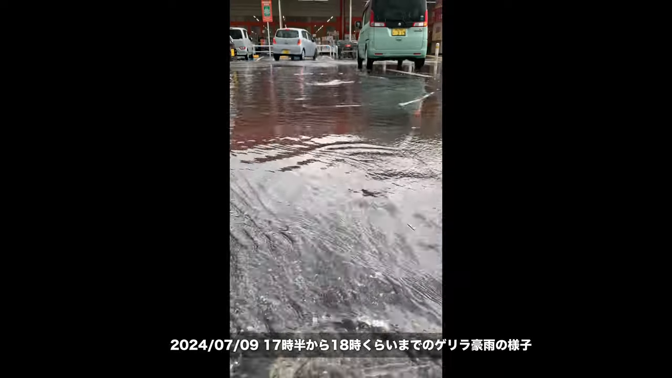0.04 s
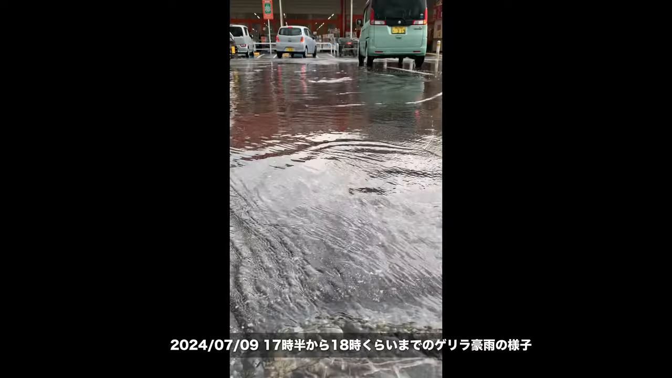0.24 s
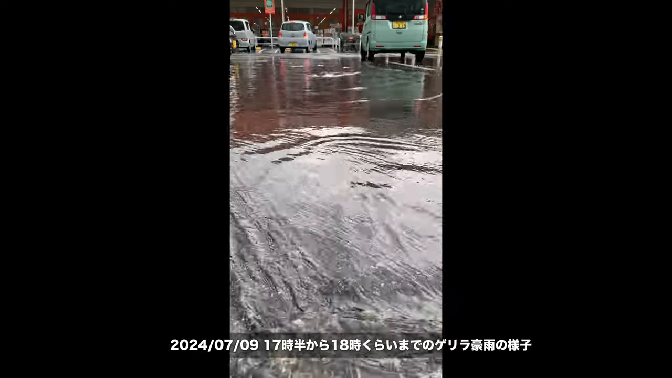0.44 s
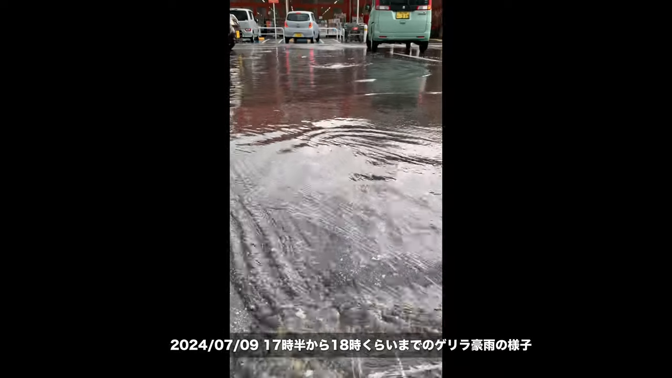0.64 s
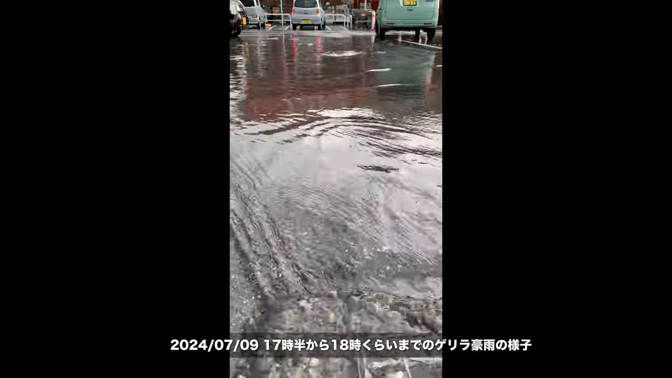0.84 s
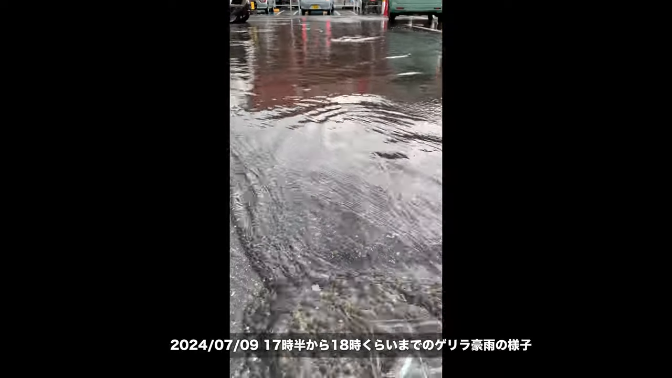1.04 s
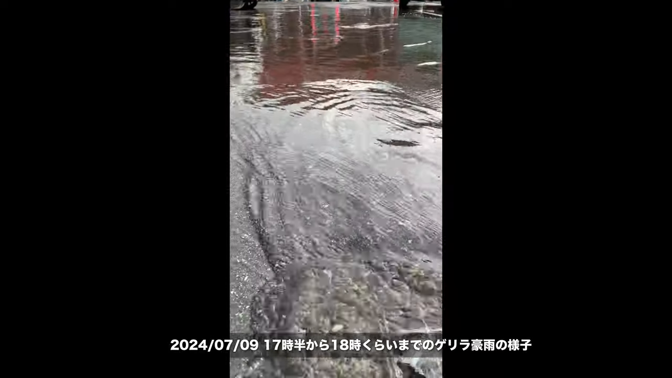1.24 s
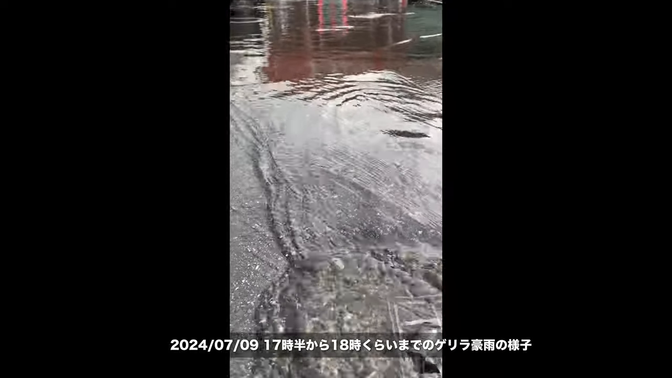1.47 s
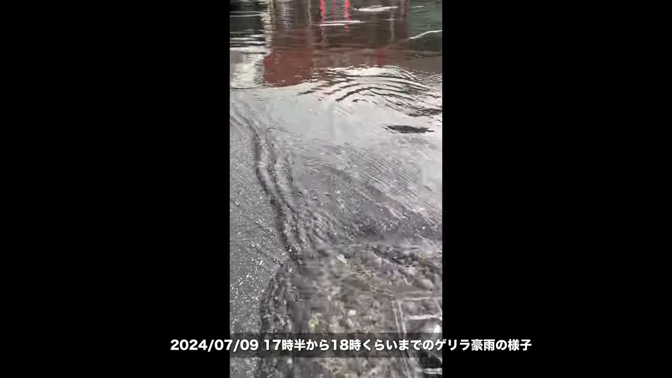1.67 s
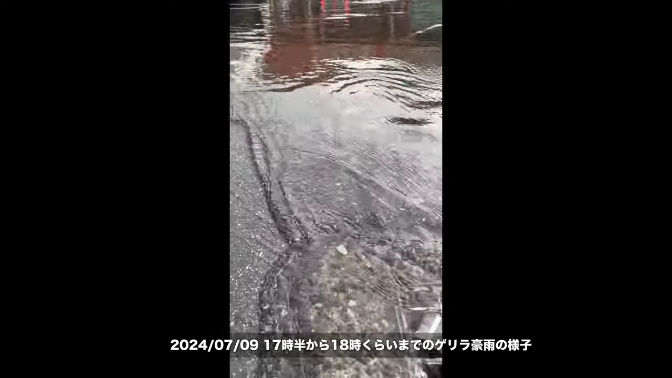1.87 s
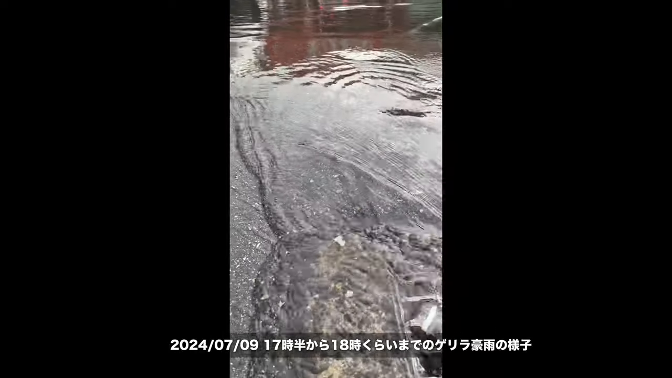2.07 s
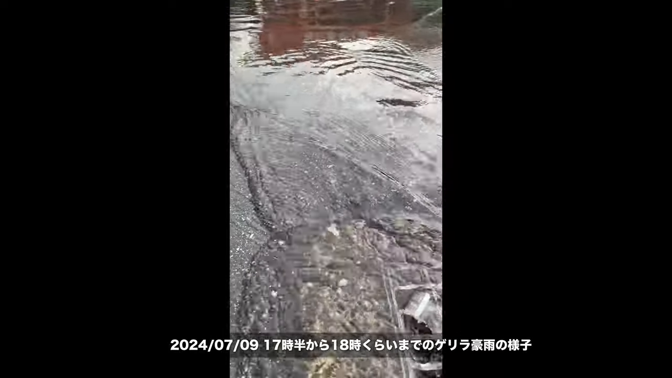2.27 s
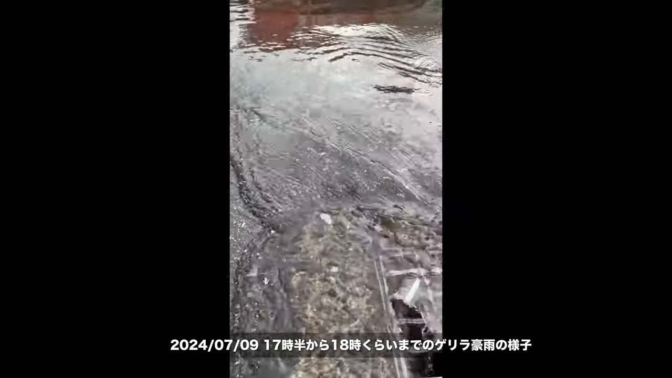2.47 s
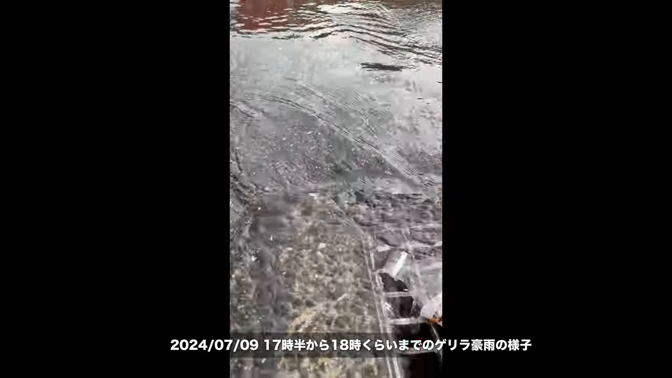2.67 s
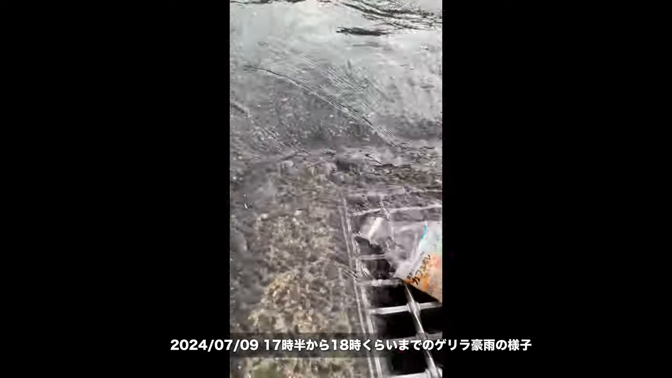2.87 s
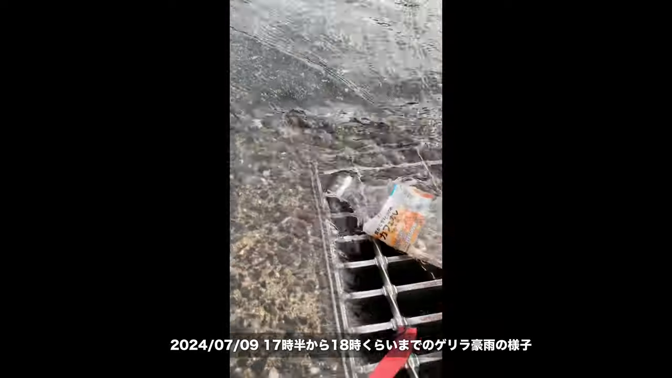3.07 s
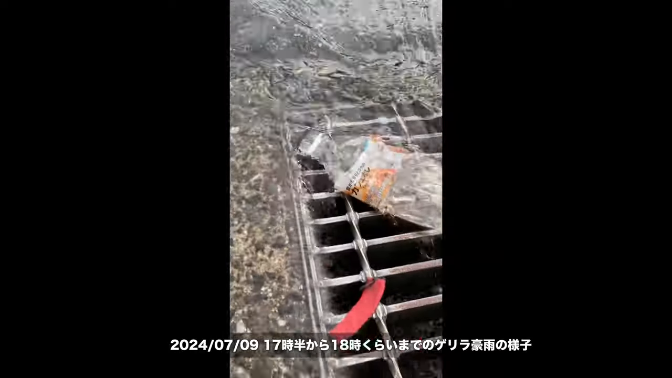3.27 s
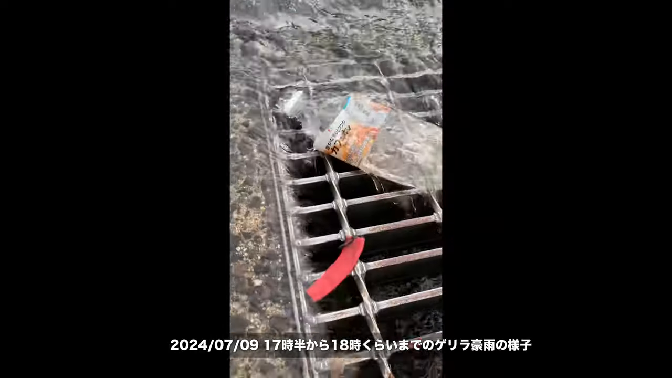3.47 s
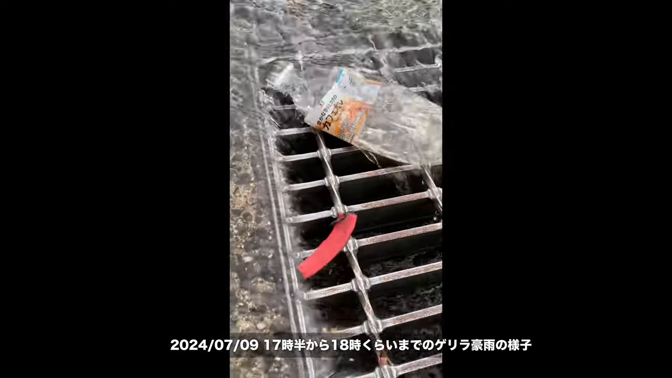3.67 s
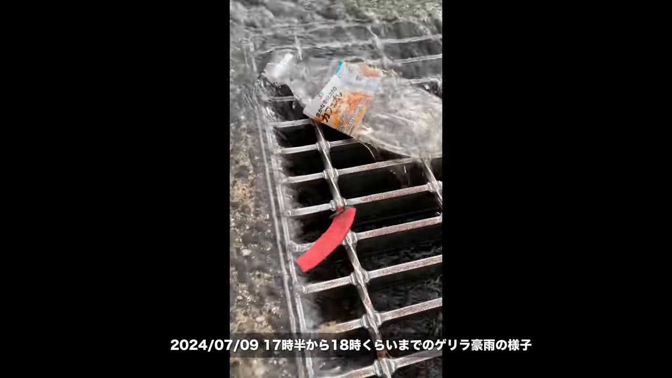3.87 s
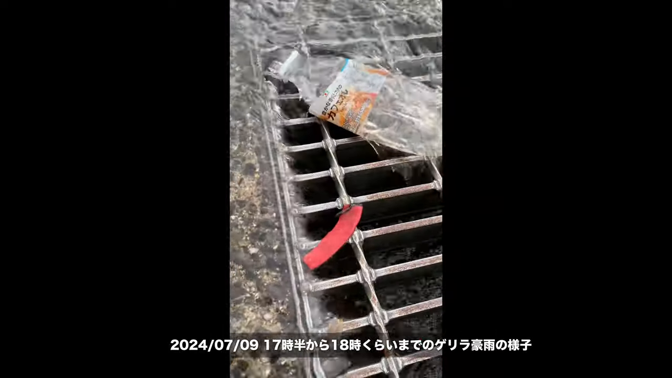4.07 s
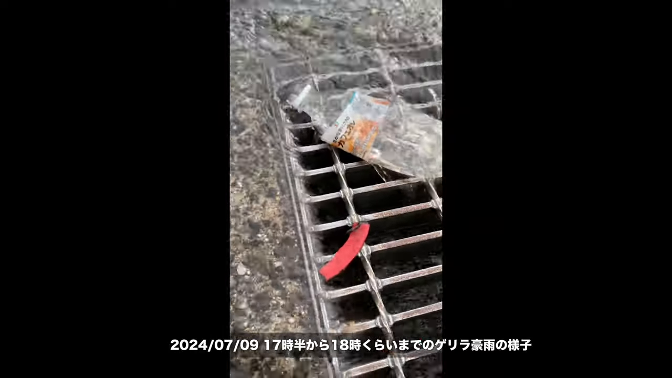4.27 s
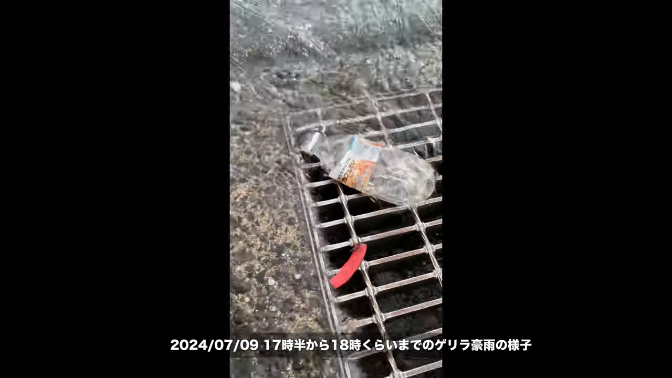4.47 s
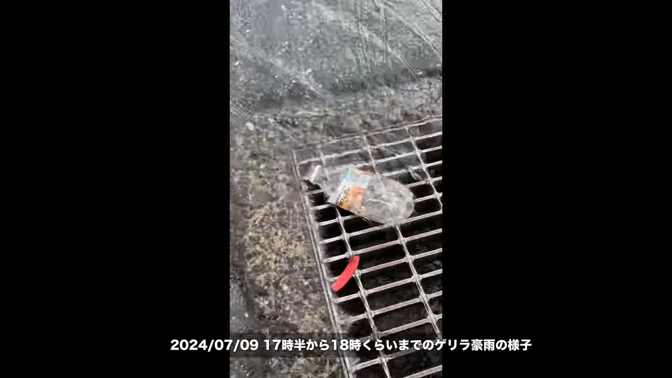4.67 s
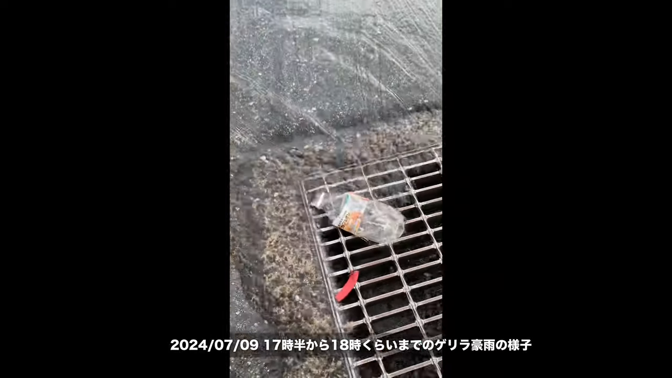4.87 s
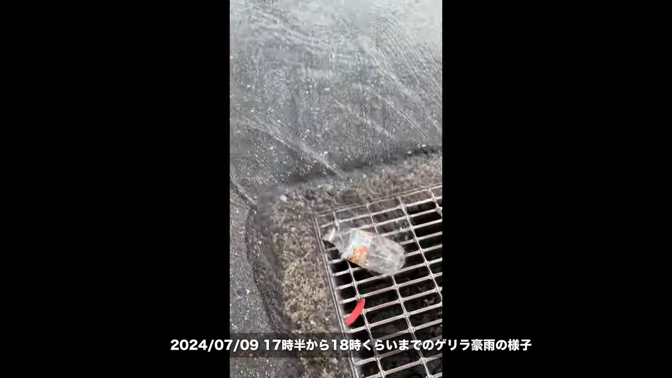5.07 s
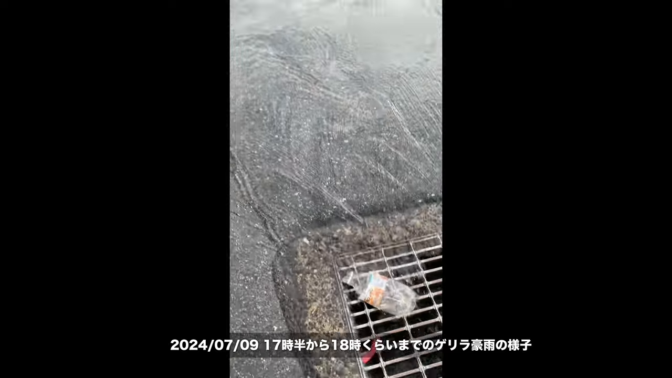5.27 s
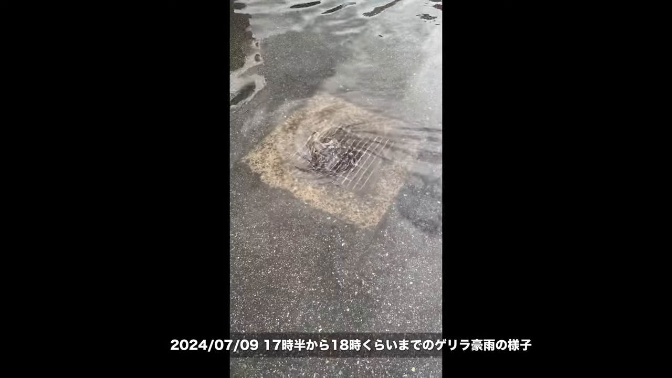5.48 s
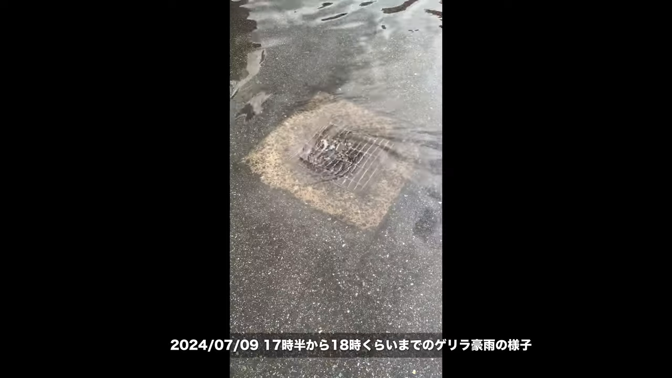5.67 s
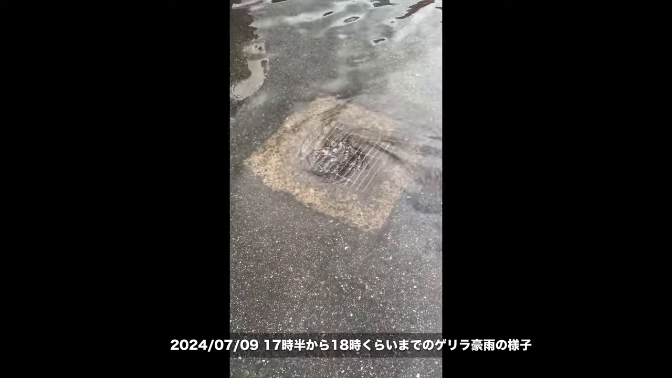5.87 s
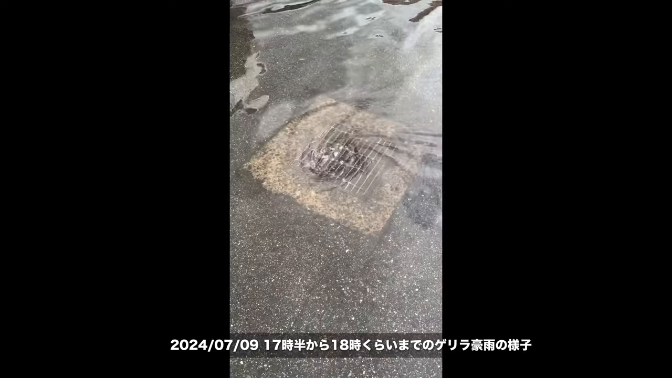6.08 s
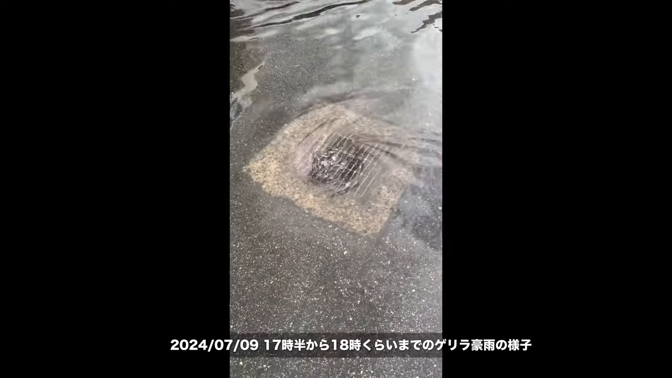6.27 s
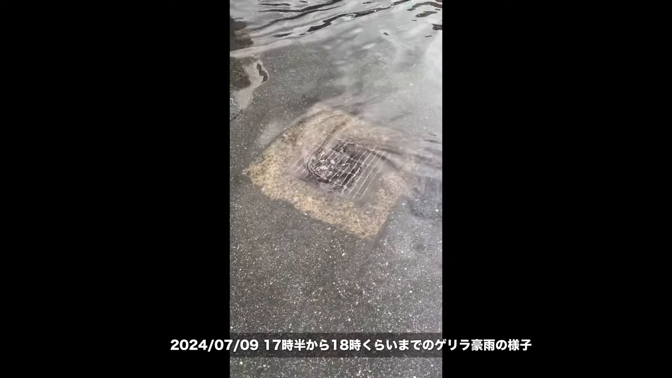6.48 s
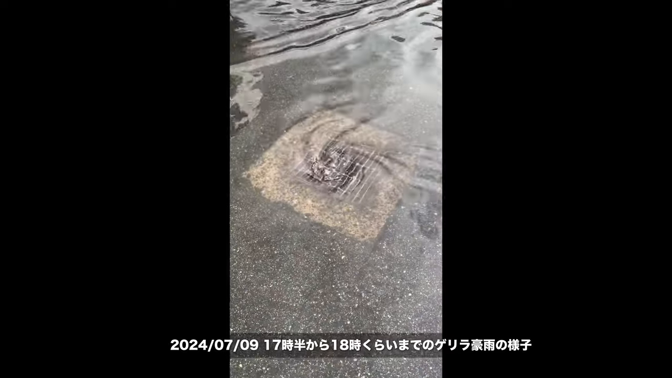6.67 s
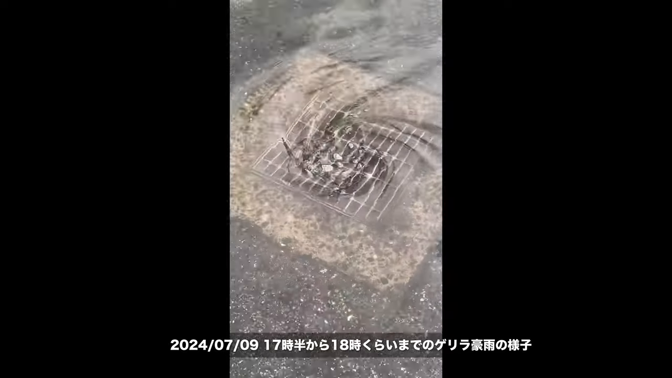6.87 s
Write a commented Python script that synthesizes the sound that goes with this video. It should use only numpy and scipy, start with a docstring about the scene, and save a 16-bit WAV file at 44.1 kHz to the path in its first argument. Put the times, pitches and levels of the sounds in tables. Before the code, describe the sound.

Floodwater rushes over pavement and gurgles into a metal drain grate, spitting and swelling close, then cuts to a quieter, smoother whirlpool drain.

```python
"""Spray spits and gurgle swells as floodwater slides over pavement and falls through a grate into a drain.
Bubbles burst and wind puffs thump a hand-held two-port microphone as it moves in and away; traffic drones far off.
A hard cut leads to a quieter whirlpool over a second drain. Coloured noise carries the flow, the rumble and
the traffic; swelling, dying sines make the bubbles and puffs; short noise bursts add the crack to each spit."""
import sys
import numpy as np
from scipy import signal
from scipy.fft import rfft, irfft, next_fast_len
from scipy.io import wavfile
from scipy.ndimage import uniform_filter1d

SR = 44100
rng = np.random.default_rng(int(sys.argv[2]) if len(sys.argv) > 2 else 0)


def digitize_waveform(pressure):
    """Quantize a signal to 16-bit integers and store it at the path in sys.argv[1].

    Rows of a 2-D input are taken as channels; values are limited to [-1, 1].
    """
    field = np.atleast_2d(pressure).T
    bounded = np.clip(field, -1, 1)
    quanta = np.round(bounded * 32767).astype(np.int16)
    wavfile.write(sys.argv[1], SR, quanta)


N = 306054
CUT_S = 5.315  # the moment the place changes
CUT = round(CUT_S * SR)
CUT_MARGIN = 300  # samples by which each place's flow overlaps the cut

# The microphone's path over the grate: start_s [s], nearness_db [dB], rumble_db [dB]
GRATE_PATH = [(0, 2.5, -39.5), (.8, 4.5, -42), (1.2, 1.5, -38), (1.6, 3.5, -43), (2, 2.5, -42.5),
              (2.8, 7.5, -47), (3.13, 7, -39), (3.35, 13, -70), (3.7, 12.5, -49), (4.05, 13.5, -48),
              (4.35, 12, -45), (4.7, 7.5, -47.5), (5.3, 4.5, -51)]
# Noise colours at the grate: pitch_hz [Hz], level_db [dB per Hz, relative]
GRATE_RUMBLE = [(12, -46), (20, -14), (34, -6), (54, 17.5), (70, 12.5), (125, -8), (168, -3.5), (289, -15),
                (323, -22), (357, -17.5), (400, -19), (520, -14.5), (880, -120)]
GRATE_GURGLE = [(150, -1), (300, -5), (450, -1.5), (650, -6), (800, -2.5), (1200, -3), (1800, -4),
                (2500, -8.5), (3500, -25.5), (6000, -86)]
GRATE_SPRAY = [(1500, -20), (2500, -2.5), (3200, 1.2), (4200, .5), (5000, 1.3), (6200, .5), (8000, -1),
               (12000, -1.5), (13500, -8.5), (16000, -8)]
# Likeness of the two ports at the grate: pitch_hz [Hz], likeness [0-1]
GRATE_SAME = [(60, .975), (300, .94), (700, .8), (1200, .85), (2000, .65), (2800, .15), (3600, .69),
              (4200, .78), (4700, .98), (5300, .8), (6100, .76), (6800, .98), (7300, .94), (7800, .68),
              (8300, .74), (8900, .98), (9400, .88), (10000, .7), (11000, .96), (11500, .94), (12100, .66),
              (13000, .97), (13500, .96), (14100, .5), (15000, .97)]
# Phase between the ports at the grate: pitch_hz [Hz], left_lead_rad [rad]; a plain delay above 4.7 kHz
GRATE_LEAD = [(60, .1), (300, -.3), (950, -.55), (1600, .15), (2300, 1.4), (3100, .7), (4700, 3.14),
              (15300, 18.85)]


def grate():
    """Water falls through the grate, and spray and gurgle swell as the microphone closes in."""
    flow = water(0, CUT + CUT_MARGIN, GRATE_PATH,
                 traffic(CUT + CUT_MARGIN, GRATE_RUMBLE),
                 gurgle(CUT + CUT_MARGIN, GRATE_GURGLE, bubbles_db=-3.),
                 spray(CUT + CUT_MARGIN, GRATE_SPRAY, fizz_db=-5., lumpy_db=1.9),
                 drone_db=-38.5, gurgle_db=-38, spray_db=-41.5)
    return ports(flow + splashes(0), GRATE_SAME, GRATE_LEAD)


# The whirlpool's levels over time: start_s [s], nearness_db [dB], rumble_db [dB]
POOL_PATH = [(5.42, 0.14, -47), (5.55, -0.69, -45), (5.8, -0.93, -35), (5.95, -0.93, -46.5),
             (6.4, -1.7, -39), (6.9, -1.5, -38.5)]
# Noise colours at the whirlpool: pitch_hz [Hz], level_db [dB per Hz, relative]
POOL_RUMBLE = [(12, -42), (20, -33), (39, 0.5), (65, -13), (99, -3.5), (123, -17), (140, -5), (189, -3),
               (289, -17), (353, -16.5), (400, -47), (520, -76), (880, -120)]
POOL_GURGLE = [(150, -44), (300, -12), (550, -7.5), (700, -15), (1300, -8), (2200, -12.5), (3200, -18.5),
               (6000, -30.5)]
POOL_SPRAY = [(1500, -25), (3500, -2.5), (5000, 0), (6500, -1), (7500, -4.5), (8300, -3), (8900, 0),
              (10300, 0), (11000, -2), (12000, -3), (13500, -10), (14500, -13), (16000, -16)]
# Likeness of the two ports at the whirlpool: pitch_hz [Hz], likeness [0-1]
POOL_SAME = [(60, .975), (300, .9), (700, .6), (1500, .8), (3200, .55)] + GRATE_SAME[6:]
# Phase between the ports at the whirlpool: pitch_hz [Hz], left_lead_rad [rad]; a plain delay above 4.7 kHz
POOL_LEAD = [(60, .1), (250, -.3), (520, -.9), (900, -3.3), (1700, -4.3), (2800, -3.8), (3500, -4.9),
             (4700, -3.14), (15300, 12.57)]


def whirlpool():
    """A quieter swirl over the second drain, with fewer strong bubbles and a smoother spray."""
    start = CUT - CUT_MARGIN
    flow = water(start, N, POOL_PATH,
                 traffic(N - start, POOL_RUMBLE),
                 gurgle(N - start, POOL_GURGLE, bubbles_db=-11.),
                 spray(N - start, POOL_SPRAY, fizz_db=-10., lumpy_db=1.1),
                 drone_db=-45, gurgle_db=-41, spray_db=-45)
    return ports(flow + splashes(CUT_S + .1), POOL_SAME, POOL_LEAD)


GURGLE_FOLLOWS = 0.62  # dB of gurgle for each dB that the spray gains
DRONE_FOLLOWS = -0.28  # dB of traffic per dB of nearness: screened a little low over the grate


def water(start, stop, path, traffic_noise, body, hiss, drone_db, gurgle_db, spray_db):
    """Rides the faders of one place between two samples; the drone, gurgle and spray levels hold at nearness 0."""
    s, *controls = np.transpose(path)
    near_db, rumble_db = (np.interp(np.arange(start, stop) / SR, s, db) for db in controls)
    bottom = signal.sosfiltfilt(signal.butter(3, 110, fs=SR, output="sos"), traffic_noise)
    out = amp(rumble_db) * evened(bottom)
    out += amp(drone_db + DRONE_FOLLOWS * near_db) * evened(traffic_noise - bottom)
    out += amp(gurgle_db + GURGLE_FOLLOWS * near_db) * evened(body)
    out += amp(spray_db + near_db) * evened(hiss)
    return np.pad(out, ((0, 0), (start, N - stop)))


def spray(n, colour, fizz_db, lumpy_db):
    """A hiss of fine drops carries ringing fizz and shorter ticks of spatter on the bars."""
    ticks_db = fizz_db - 5.
    hiss = wash(n, colour, size=256, patchy_db=lumpy_db, flicker_db=0.98 * lumpy_db)
    fizz = grains(n, colour, 2454.0, 14750.0, cycles=6., per_s=1200., spread_db=4.5, is_spray=True)
    ticks = grains(n, colour, 2730.0, 12800.0, cycles=1.6, per_s=300., spread_db=3., is_spray=True)
    return hiss + amp(fizz_db) * fizz + amp(ticks_db) * ticks


def gurgle(n, colour, bubbles_db):
    """Tumbling water is a patchy noise that carries ringing bubbles of many sizes."""
    body = wash(n, colour, size=512, patchy_db=2.5, flicker_db=0.52)
    bubbles = grains(n, colour, 297.7, 3916.0, cycles=9.12, per_s=800., spread_db=3.5, is_spray=False)
    return body + amp(bubbles_db) * bubbles


CLUMP_S, CLUMP_DB = .06, 3.  # smoothing time and depth of the surges that bubbles come in


def grains(n, colour, low_hz, high_hz, cycles, per_s, spread_db, is_spray):
    """Sparse random bubbles of many sizes, a few of them loud; returns the near sound and its scattered copy."""
    count = 30
    surge = evened(uniform_filter1d(rng.standard_normal(n), round(CLUMP_S * SR)))
    strength = amp(spread_db * np.minimum(rng.exponential(1, n), 4))
    strikes = strength * (rng.random(n) < per_s * amp(CLUMP_DB * surge) / SR)
    kind, out = rng.integers(0, count, n), np.zeros(n)
    for k, hz in enumerate(np.geomspace(low_hz, high_hz, count)):
        shape = bubble(hz, cycles * rng.uniform(0.57, 1.6))
        # log spacing puts fewer sizes into each treble hertz, hence the root of the pitch
        gain = amp(read(colour, hz)) * np.sqrt(hz) / np.linalg.norm(shape)
        out += signal.oaconvolve(strikes * (kind == k), gain * shape)[:n]
    return scattered(evened(out), is_spray)


def splashes(start_s):
    """The single spits, plops, glugs and puffs that stand out of the flow after a moment."""
    late = np.arange(N) / SR >= start_s
    low_sounds = plops() + glugs() + puffs()
    return scattered(spits() * late, True) + scattered(low_sounds * late, False)


CRACK_HZ, CRACK_S = (4000, 12000), .0035  # band and t60 of the crack

# The loudest spits: start_s [s], level_db [ring peak dB], pitch_hz [Hz], cycles [count], crack_db [peak dB]
SPITS = [(0.205, -26, 8630.0, 10.0, -32), (0.2208, -39, 4720.0, 6.0, -38),
         (0.2642, -31, 14500.0, 10.0, -17), (0.3807, -28, 9600, 15, -14), (0.4456, -22.5, 7200, 6.1, -37),
         (0.537, -20, 7000, 3.3, -29), (0.6451, -22, 6400, 3, -28), (0.7668, -20, 6360, 3.4, -26),
         (0.7998, -29, 4300, 3, -40), (0.855, -35, 13300.0, 16.0, -21), (1.0518, -17, 12100, 3.9, -33),
         (1.1878, -35, 13300.0, 16.0, -30), (1.253, -18, 10500, 4.9, -16),
         (1.3662, -28, 13300.0, 10.0, -23), (1.3883, -23, 11200.0, 6.0, -30),
         (1.3965, -29, 14500.0, 10.0, -36), (1.4346, -26, 6460, 5.5, -24), (1.4678, -31, 3970.0, 3.5, -33),
         (1.4979, -25, 6070, 6.0, -38), (1.508, -37, 13300.0, 16.0, -34), (1.5499, -17, 11200.0, 2.0, -27),
         (1.5614, -25, 11200.0, 10.0, -28), (1.5677, -30, 9410.0, 10.0, -35),
         (1.5746, -27, 14500.0, 10.0, -16.5), (1.6439, -28, 11000, 16.0, -34),
         (1.7616, -45, 2810.0, 6.0, -37), (1.7903, -28, 6700, 6.0, -26), (1.8745, -28, 7200, 6.0, -34),
         (1.925, -37, 13300.0, 10.0, -16), (2.022, -21, 8400, 3.1, -19), (2.0831, -29.5, 8700, 10.0, -40),
         (2.0936, -21, 6600, 3.5, -16.5), (2.1099, -20, 11200.0, 3.5, -22), (2.1452, -28, 7040, 3, -29),
         (2.15, -32.0, 14500.0, 10.0, -22), (2.2145, -20.5, 6660.0, 3.2, -33),
         (2.2344, -29, 5610.0, 10.0, -30), (2.2478, -32, 13300.0, 10.0, -16),
         (2.275, -29, 8630.0, 6.0, -33), (2.311, -24.5, 5460, 7.9, -19), (2.3307, -28, 5100, 6.0, -40),
         (2.4098, -18, 6500, 3.5, -17), (2.4502, -29, 10900, 16.0, -7.5), (2.49, -20, 8700, 6.4, -14),
         (2.576, -18.0, 12200.0, 3.5, -21), (2.579, -10, 10600, 3.1, -19), (2.6683, -22, 7160, 6.0, -25),
         (2.6943, -28.0, 14500.0, 6.0, -20), (2.7574, -28, 3240, 12, -24),
         (2.9335, -27.5, 13300.0, 6.0, -22), (2.9428, -15, 12100, 3.5, -10), (2.988, -14, 11200.0, 4, -28),
         (3.022, -18.5, 6650, 6.0, -11), (3.0477, -20, 3100, 5, -14), (3.0554, -32.5, 13300.0, 16.0, -12),
         (3.0602, -9, 7300, 2.2, -6.5), (3.0658, -16, 5140.0, 3.2, -29), (3.08, -19, 5100, 6.0, -33),
         (3.0886, -29, 4330.0, 6.0, -31), (3.1055, -25, 2650, 6.0, -36), (3.1238, -27, 5140.0, 3.5, -34),
         (3.1826, -26, 8630.0, 16.0, -24), (3.2015, -18, 10500, 8.6, -10), (3.2198, -17, 4800, 1.8, -31),
         (3.2226, -14.5, 5970, 4, -29), (3.2375, -29, 4700, 3, -26), (3.254, -8, 11200.0, 2.8, -17),
         (3.2551, -32, 4330.0, 3.5, -25), (3.2617, -27.0, 13300.0, 10.0, -26),
         (3.2731, -21, 4400, 2.3, -30), (3.277, -24, 12000, 4, -26), (3.282, -21, 4750, 3.2, -32),
         (3.292, -15, 13300.0, 2.0, -19), (3.2926, -14, 9900, 7.6, -19), (3.3083, -31, 13300.0, 16.0, -33),
         (3.3156, -18, 5140.0, 5, -21), (3.33, -22, 11200.0, 6.0, -15), (3.3282, -25, 4330.0, 2.0, -11),
         (3.3573, -21, 11200.0, 6.0, -17), (3.3702, -14, 9350, 2.7, -27), (3.3972, -9, 5700, 1.4, -26),
         (3.417, -14, 10200, 4.8, -10), (3.4237, -17, 4650, 6.9, -24), (3.445, -21, 5140.0, 3.5, -32),
         (3.4498, -19, 11100, 10.0, -25), (3.474, -24.5, 14500.0, 10.0, -17), (3.4814, -28, 4760, 6.0, -21),
         (3.606, -23.0, 4300, 8.4, -29), (3.697, -18, 4970, 3, -12), (3.7115, -14, 7920.0, 6.0, -28),
         (3.7733, -15, 10800, 6.0, -24), (3.8429, -15, 6110.0, 3.8, -26), (3.862, -18.5, 8630.0, 6.0, -8),
         (3.9566, -13, 10900, 6.0, -21), (3.9632, -14, 10100, 6.0, -24), (4.0145, -3.5, 8450, 1.3, -22),
         (4.027, -12.0, 10200, 2.0, -12), (4.0368, -25, 4720.0, 3.5, -32), (4.051, -12, 11200.0, 3.5, -19),
         (4.0673, -18, 10000, 6.0, -19), (4.0895, -25, 3100, 12, -30), (4.2189, -13.5, 6780, 8.2, -9),
         (4.254, -22, 4740, 3.5, -32), (4.2645, -17.5, 10200, 11, -15), (4.4167, -33, 4330.0, 6.0, -23),
         (4.507, -22, 13300.0, 6.0, -21), (4.51, -34, 5140.0, 3.1, -13), (4.6231, -21.5, 2600, 8.3, -31),
         (4.6433, -22, 6760, 7.1, -25), (4.667, -23.5, 3320, 3.5, -18), (4.688, -25, 11200.0, 10.0, -25),
         (4.8056, -22, 6600, 5.6, -10), (4.8481, -23, 8800, 3, -17), (4.872, -25, 10000, 10.0, -27),
         (5.036, -25, 9410.0, 3.1, -28), (5.0514, -27.5, 8550, 10.0, -13.5), (5.0636, -33, 3530, 5.1, -38),
         (5.0704, -28, 3520, 7.5, -36), (5.1826, -20.5, 6740, 8, -35), (5.2894, -40, 9410.0, 10.0, -32),
         (6.7877, -33, 8700, 10.0, -38)]


def spits():
    """Each spit of spray tears a water film with a wide crack and rings a tiny bubble."""
    out, t = np.zeros(N), np.arange(300) / SR
    tears = rng.standard_normal((len(SPITS), len(t))) * amp(-60 * t / CRACK_S)
    cracks = signal.sosfilt(signal.butter(1, CRACK_HZ, "band", fs=SR, output="sos"), tears)
    for (s, level_db, hz, cycles, crack_db), crack in zip(SPITS, cracks):
        add(out, s, amp(crack_db) * crack / abs(crack).max())
        add(out, s, amp(level_db) * bubble(hz, max(cycles, 1)))
    return out


# The loudest bubbles: start_s [s], level_db [peak dB], pitch_hz [Hz], cycles [count]
PLOPS = [(0.188, -33, 2040, 4.9), (0.2014, -31, 470, 5.2), (0.2638, -24, 840, 3), (0.2653, -24, 1400, 2.6),
         (0.293, -44, 2580.0, 10.0), (0.71, -28, 860, 5.4), (0.792, -30, 810, 3.2),
         (0.9974, -33, 743, 10.0), (1.147, -33.5, 380, 5.2), (1.2376, -33, 2580.0, 3.5),
         (1.443, -26.5, 1710, 6), (1.5436, -28, 990, 3.5), (1.5523, -28, 890, 10.5),
         (1.554, -29, 1550, 5.5), (1.555, -38, 385.0, 3.5), (1.573, -28, 1340, 8.5),
         (1.5869, -27.5, 1330, 5.7), (1.6345, -32, 486, 5.9), (1.733, -31, 1500, 3.5),
         (2.0296, -30, 2030, 5.5), (2.085, -33, 1246, 12), (2.1498, -29.5, 470, 3.4),
         (2.1657, -25, 1520, 5.1), (2.452, -27, 280, 2.3), (2.5057, -30.0, 1510, 8), (2.526, -34, 950, 5.5),
         (2.583, -32.5, 2560, 6.0), (2.5952, -27, 955, 6.9), (2.698, -25, 1790, 9.6), (2.717, -28, 2430, 6),
         (2.7742, -32, 636, 8.3), (2.7862, -36, 2170.0, 6.0), (2.798, -16, 1970, 3.3),
         (2.9305, -28, 2120, 6.0), (2.9807, -32.5, 482, 6.9), (3.003, -24, 1060, 4.8),
         (3.1575, -25.5, 417, 4), (3.1856, -18, 1670.0, 2.6), (3.189, -31.5, 464, 12.6),
         (3.195, -21, 1180, 3.7), (3.221, -26, 1090, 3.2), (3.228, -18.5, 1800, 4.1),
         (3.2629, -26, 714, 6.7), (3.2698, -25, 1150, 5.6), (3.3165, -22, 1190, 2.6),
         (3.4674, -18.5, 1180, 5.6), (3.548, -30, 434, 4.2), (3.571, -30, 1070, 5), (3.528, -32, 432, 7.8),
         (3.6239, -14, 2600, 1.7), (3.6676, -31, 593.0, 1.9), (3.6692, -17.5, 2130, 3),
         (3.7505, -15.5, 2360.0, 1.3), (3.7528, -16, 1380, 1.6), (3.808, -26, 840, 3.7),
         (3.831, -21, 900, 5), (3.8382, -22.5, 712, 4.6), (3.84, -21.5, 1080, 3.8), (3.882, -20, 1700, 3.9),
         (3.945, -28.5, 462, 9.4), (3.9576, -24, 1420, 3.5), (3.981, -29, 322, 10.6),
         (4.039, -30, 327, 7.3), (4.0619, -25, 645, 5.2), (4.074, -29, 338, 4.1), (4.079, -25, 1280, 4.9),
         (4.1505, -24, 2170, 13), (4.204, -22, 924, 6.2), (4.249, -31, 490, 4.1), (4.3118, -21, 1970, 3.2),
         (4.3663, -22, 1540, 5), (4.378, -23, 1130, 5.2), (4.4266, -14.5, 1680, 2.2), (4.45, -28, 895, 12),
         (4.48, -21, 1530.0, 3.5), (4.482, -36.5, 345, 6.9), (4.548, -31, 1080, 7.1),
         (4.58, -20.5, 1990.0, 3.1), (4.5986, -34, 540, 7.8), (4.603, -23, 2500, 2.8),
         (4.6119, -19, 2000, 3.1), (4.614, -30, 432, 2.5), (4.624, -26, 1710, 6.8),
         (4.6672, -26, 2170.0, 2.0), (4.7111, -26.0, 1950, 4), (4.7548, -18, 1600, 3),
         (4.82, -28, 1610, 8.7), (4.885, -24, 1360, 4), (4.982, -26, 1720, 8), (4.938, -27, 1290.0, 5.4),
         (4.946, -24, 1420, 4.9), (5.0115, -36, 2090, 6.0), (5.1072, -28, 1000, 3.2),
         (5.239, -24, 1610, 5.3), (5.242, -25, 1080, 2.0), (5.2477, -27, 625, 2.9), (5.2608, -32, 696, 3),
         (5.2909, -28.5, 1020, 11.7), (5.2912, -31, 617, 5.3), (5.2905, -39, 315, 3.4),
         (6.695, -38, 1540, 11)]


def plops():
    """Single pockets of air ring as damped tones that climb slightly."""
    out = np.zeros(N)
    for s, level_db, hz, cycles in PLOPS:
        add(out, s, amp(level_db) * bubble(hz, max(cycles, 1)))
    return out


# Large air pockets: start_s [s], level_db [peak dB], pitch_hz [first Hz], cycles [count], climb [fraction]
GLUGS = [(0.565, -33, 470, 12, .07), (0.618, -28, 141.6, 11, 0.18), (0.8118, -27, 471, 9.5, 0.025),
         (3.32, -23, 374, 7.4, 0.055), (3.4984, -32, 369, 7, 0.13), (3.872, -25, 1256, 9.8, .2),
         (6.609, -24, 600, 3.9, -0.078)]


def glugs():
    """Large pockets of air ring with their own pitch slides, most upward and one downward."""
    out = np.zeros(N)
    for s, level_db, hz, cycles, climb in GLUGS:
        add(out, s, amp(level_db) * bubble(hz, cycles, climb))
    return out


# Puffs of wind on the ports: start_s [s], level_db [peak dB], pitch_hz [Hz]
PUFFS = [(0.024, -33, 62.5), (0.214, -25, 66.7), (1.24, -35, 59), (1.522, -30, 49.4), (5.633, -24.5, 68),
         (5.737, -26, 56), (5.85, -38, 75), (6.279, -31, 80.5), (6.49, -38, 46), (6.577, -31, 75),
         (6.91, -26, 79)]


def puffs():
    """Wind thumps the ports: a short low pulse that swells and dies like a bubble."""
    out = np.zeros(N)
    for s, level_db, hz in PUFFS:
        add(out, s, amp(level_db) * bubble(hz, cycles=1.67))
    return out


def traffic(n, colour):
    """Far traffic and deep rumble are one slowly drifting low noise, split later by pitch."""
    return wash(n, colour, size=4096, patchy_db=1.5, flicker_db=0.93)


def bubble(hz, cycles, climb=.04):
    """A pocket of air rings, its pitch up by the climb fraction at the loudest point; peak near 1."""
    u = np.arange(int(3 * cycles * SR / hz) + 8) * hz / (cycles * SR)
    envelope = np.e * 2 * u * np.exp(-2 * u)
    return envelope * np.sin(2 * np.pi * cycles * u * (1 + climb * u))


def wash(n, colour, size, patchy_db, flicker_db):
    """Two unrelated noises of one colour that share drifting patches and a flicker across all pitches."""
    hop = size // 4
    frames, hz = n // hop + 5, np.fft.rfftfreq(size, 1 / SR)
    a, b, c, d, patches = rng.standard_normal((frames, len(hz), 5)).T
    patches = uniform_filter1d(patches, size=4, axis=0)  # across pitch
    patches = evened(uniform_filter1d(patches, size=10, axis=1))  # across time
    flicker = evened(uniform_filter1d(rng.standard_normal(frames), size=6))
    level_db = read(colour, hz)[:, None] + patchy_db * patches + flicker_db * flicker
    spectra = np.array([a + 1j * b, c + 1j * d]) * amp(level_db)
    return evened(signal.istft(spectra, nperseg=size, noverlap=size - hop)[1][:, :n])


SHAFT_S = 0.059  # t60 of the scatter of bubbles in the drain shaft
SPRAY_TAIL_S, SPRAY_TAIL_DB = 0.036, -8  # t60 and level of the patter that trails each drop
PLACE_S = .006  # smoothing time of the side on which the spray lands


def scattered(x, is_spray):
    """Pairs a sound with the part the far port hears differently: shaft echo for bubbles; for spray
    a quarter-turn of phase whose sign changes as drops land to one side or the other."""
    if not is_spray:
        return np.array([x, smeared(x, SHAFT_S)])
    x = x + amp(SPRAY_TAIL_DB) * smeared(x, SPRAY_TAIL_S)
    side = np.tanh(4 * evened(uniform_filter1d(rng.standard_normal(len(x)), round(PLACE_S * SR))))
    quarter_turn = signal.hilbert(x, next_fast_len(len(x))).imag[:len(x)]
    return np.array([x, side * quarter_turn])


def smeared(x, t60):
    """A copy of a sound through a dying burst of reflections, energy 1."""
    echo = rng.standard_normal(2000) * amp(-60 * np.arange(2000) / SR / t60)
    return signal.oaconvolve(x, echo / np.linalg.norm(echo))[:len(x)]


# Level tilt between the ports: pitch_hz [Hz], left_minus_right_db [dB]
TILT = [(60, .4), (150, 2), (380, .3), (950, 0), (2400, -.6), (6000, 0), (15000, 0)]


def ports(pair, same, lead):
    """Left hears the near sound; right blends it with the other part; phase and level differ by pitch."""
    size = next_fast_len(N + 1000)
    hz, (near, other) = np.fft.rfftfreq(size, 1 / SR), rfft(pair, size)
    likeness = np.clip(read(same, hz), 0, 1)
    # each port takes half of the level and phase difference
    half = amp(read(TILT, hz) / 2) * np.exp(.5j * np.interp(hz, *np.transpose(lead)))
    blend = likeness * near + np.sqrt(1 - likeness ** 2) * other
    return irfft(np.array([near * half, blend / half]), size)[:, :N]


def amp(db):
    """Decibels to gain."""
    return 10 ** (np.asarray(db) / 20)


def evened(x):
    """Scales to rms 1."""
    return x / np.sqrt(np.mean(x ** 2) + 1e-20)


def read(points, hz):
    """Reads a spectrum on a log-frequency axis."""
    f, value = np.transpose(points)
    return np.interp(np.log(hz + 1), np.log(f + 1), value)


def add(mix, s, sound):
    """Lays a sound into the mix at time s."""
    part = mix[round(s * SR):][:len(sound)]
    part += sound[:len(part)]


def scene():
    """The grate, then the whirlpool, joined by a 3 ms crossfade."""
    after = np.clip((np.arange(N) - CUT) / 130, 0, 1)
    return (1 - after) * grate() + after * whirlpool()


def record(dry):
    """The microphone drops the deepest bass; then a steep low-pass limits the treble."""
    thin = signal.sosfilt(signal.butter(2, 36., "high", fs=SR, output="sos"), dry)
    low_pass = signal.firwin(1023, 15740, window=("kaiser", 9), fs=SR)
    return signal.oaconvolve(thin, low_pass[None], "same")


dry = scene()
out = record(dry)
digitize_waveform(out)
```